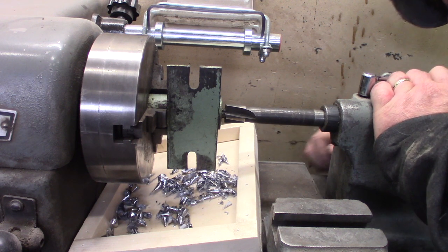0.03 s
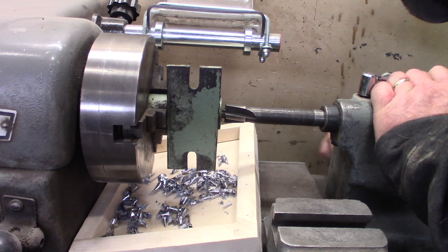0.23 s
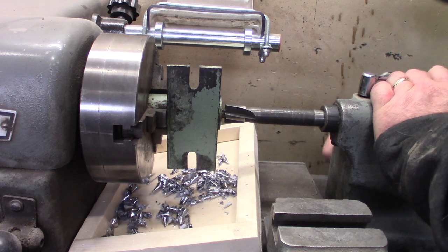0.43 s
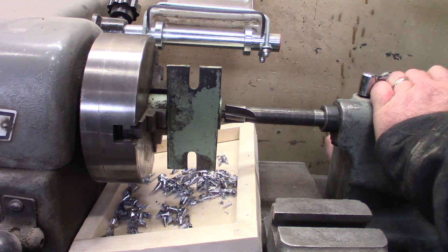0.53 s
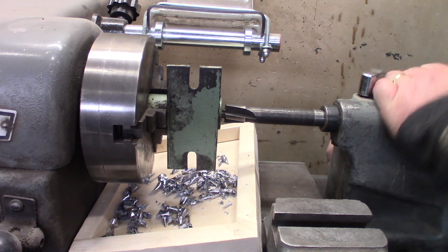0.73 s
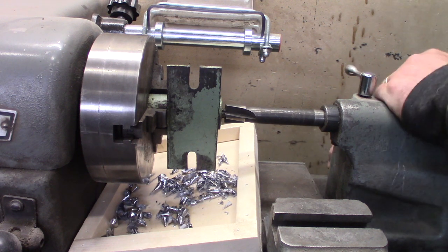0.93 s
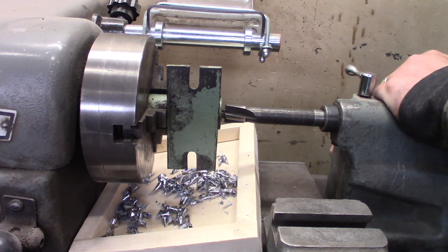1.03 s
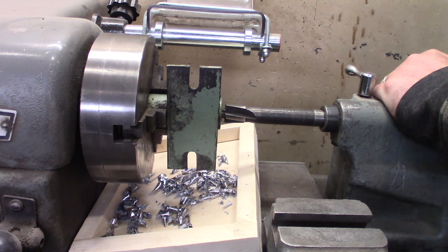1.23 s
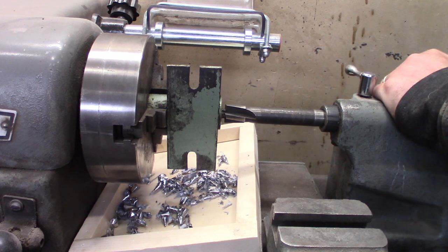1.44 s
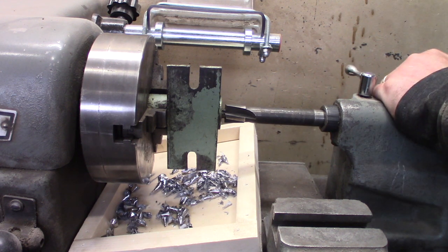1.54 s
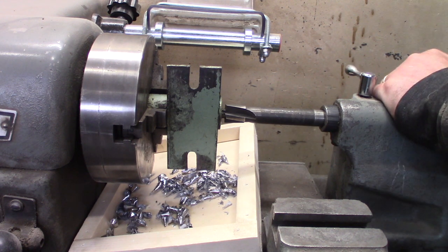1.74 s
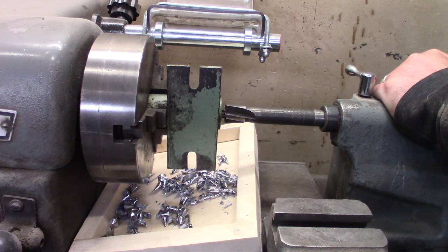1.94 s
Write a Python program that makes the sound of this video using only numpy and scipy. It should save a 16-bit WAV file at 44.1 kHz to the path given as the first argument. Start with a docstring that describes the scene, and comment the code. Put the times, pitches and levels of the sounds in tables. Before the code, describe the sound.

A steel lever on a still lathe is worked by hand, close up. A previous clack's ring fades over faint dull knocks. At 0.21 s a tick leads into a loud, sharp clack with quick rebounds, then weaker clicks at 0.40-0.43. A light knock at 0.72 joins a hand swish peaking near 0.8; small parts scuff and rattle around 1.15-1.2. Quiet shop air and hum continue until a low thud at 1.97.

```python
"""A steel lever on a lathe's tailstock is worked by hand: it ticks, clacks hard and rebounds.
Each blow rings damped modes, amid short contact noise and the longer noise of the machine bed.
The casting answers soft knocks with low modes; a sliding hand and rattling small parts are grainy noise.
The lathe stands still: a reverberant shop rings on over steady coloured noise and a wavering hum."""
import sys
import numpy as np
from scipy import signal
from scipy.fft import rfft, irfft, next_fast_len
from scipy.io import wavfile
from scipy.ndimage import map_coordinates

SR = 44100
rng = np.random.default_rng(int(sys.argv[2]) if len(sys.argv) > 2 else 0)


def voltage_ratio(decibels):
    """Convert decibels (scalar or array-like) to amplitude ratios, 20 dB per decade."""
    exponent = np.asarray(decibels, float) / 20
    return 10 ** exponent


def generate_wav(signal):
    """Clip the signal to [-1, 1] and save it as 16-bit WAV at the path in sys.argv[1]."""
    frames = np.transpose(np.atleast_2d(signal))
    scaled = np.clip(frames, -1, 1) * 32767
    pcm = np.round(scaled).astype(np.int16)
    wavfile.write(sys.argv[1], SR, pcm)


N = 88200  # samples
BLOW_T = np.arange(SR * 3 // 5) / SR  # time since a blow, s


def unit(x):
    """Power normalization: scales x to rms 1."""
    return x / np.sqrt(np.mean(x ** 2) + 1e-20)


def along(points, hz):
    """Linear interpolation of (Hz, value) points on a logarithmic frequency axis."""
    point_hz, value = np.transpose(points)
    return np.interp(np.log(hz + 1), np.log(point_hz + 1), value)


def filtered(x, response):
    """Linear filtering: the spectrum of x is multiplied by a response of frequency."""
    n = x.shape[-1]
    padded = next_fast_len(n + 8192)
    spectrum = rfft(x, padded) * response(np.fft.rfftfreq(padded, 1 / SR))
    return irfft(spectrum, padded)[..., :n]


def noise(spectrum, size, colour=lambda hz: 0):
    """Spectral shaping: white noise is coloured, with extra dB from colour, and set to rms 1."""
    white = rng.standard_normal(size)
    return unit(filtered(white, lambda hz: voltage_ratio(along(spectrum, hz) + colour(hz + 50))))


def wobble(rate):
    """Slow random modulation: a spline through random knots, rate knots a second."""
    knots = rng.standard_normal(int(N * rate / SR) + 4)
    return map_coordinates(knots, [np.arange(N) * rate / SR])


def decay(db, t60):
    """Exponential damping: starts at a level in dB and falls by 60 dB in t60 seconds."""
    return voltage_ratio(db - 60 * BLOW_T / t60)


def lift(hz, hz0, lift_db, octaves):
    """Modal excitation: where a blow lands favours the modes near one pitch."""
    return lift_db * np.exp(-(np.log2(hz / hz0) / octaves) ** 2)


def ring(modes, colour):
    """Modal superposition: damped sines struck together, with levels and phases varied by chance."""
    hz, db, t60 = np.transpose(modes)[..., None]
    chance = rng.standard_normal((2, len(modes), 1))
    level = voltage_ratio(db + colour(hz) + 1.6 * chance[0])  # scatter in dB
    phase = 0.92 * chance[1]  # radians
    waves = level * decay(0, t60) * np.sin(2 * np.pi * hz * BLOW_T + phase)
    return waves.sum(0) / np.sqrt(np.sum(level ** 2))


def clack(db, tilt_db, hz0, lift_db):
    """Impact excitation: steel on steel rings modes amid fast contact noise and the slower bed."""
    # Modes of the lever and clamp. Each row: frequency in Hz, relative level in dB, t60 in seconds.
    steel = [(1196, -16.5, 0.12), (1447, -3.5, 0.11), (1667, -8.5, 0.083), (1930, -12.5, 0.145),
             (2068, -1, 0.076), (2208, -10, 0.16), (2325, -3, 0.0391), (2322, -5.5, 0.024),
             (2546, -9, 0.055), (2708, -19.5, 0.056), (2980, -17.5, 0.064), (3664, -4.5, 0.062),
             (4216, 1, 0.047), (4558, -9, 0.046), (4530, -5, 0.064), (5186, -3, 0.052),
             (5600, -10.5, 0.082), (5970, -9.5, 0.047), (6930, -14, .04), (7740, -13, 0.06),
             (8460, -15.5, .05), (10140, -7, 0.029)]
    # Rattle of the contact. Each row: frequency in Hz, relative spectral level in dB per Hz.
    chatter_tone = [(250, -38), (720, -3.5), (1000, -15), (1450, -8.5), (2150, -7), (3200, -10.5),
                    (4500, -5.5), (5400, -7.5), (6800, -10.5), (10000, -13), (12000, -25.5), (15500, -52)]
    # Dense ringing of the machine bed. Each row: frequency in Hz, relative spectral level in dB per Hz.
    bed_tone = [(180, -31), (300, -18), (600, -10.5), (869, -8.5), (1420, -4), (2300, -2), (3440, -5),
                (5200, -7), (7670, -15.5), (15000, -52.5)]

    def colour(hz):
        return tilt_db * np.log2(hz) + lift(hz, hz0, lift_db, octaves=0.24)

    chatter = decay(-6, t60=0.057) * noise(chatter_tone, len(BLOW_T), colour)
    bed = decay(-28.5, t60=0.65) * noise(bed_tone, len(BLOW_T))
    onset = 1 - np.exp(-BLOW_T / 0.0003)  # time constant in seconds
    return voltage_ratio(db) * onset * (ring(steel, colour) + chatter + bed)


def lever():
    """Superposition of impacts: the ticks, clacks and rebounds of the lever add up."""
    # Steel blows. Each row: start in seconds, level in dB, treble tilt in dB per octave,
    # favoured pitch in Hz, its lift in dB.
    clacks = [(.2138, -27.5, -4.5, 5960, 18), (.2222, -43, -19, 2130, -4), (0.2251, -7, -0.5, 4660, 1.5),
              (.2305, -11.5, 4, 4600, 4.5), (.2342, -21, -3, 1700, 3), (.2435, -22.5, -6.5, 1730, 0),
              (.400, -35.5, -5.5, 1700, 5.5), (.4302, -27, -8, 2280, 31), (.4305, -30, -4.5, 5200, 7),
              (0.4322, -25, -6, 2660, 24), (1.1515, -43, 1, 2230, 23), (1.1515, -48, 8, 6900, 16),
              (1.158, -50, -2, 2120, 12), (1.1755, -48, 8, 6150, 29), (1.188, -38.5, -8, 2940, 22.5),
              (1.1885, -45, -5.5, 7060, 18)]
    out = np.zeros(N + SR)
    for start, *blow in clacks:
        out[round(start * SR):][:len(BLOW_T)] += clack(*blow)
    return out[:N]


def casting():
    """Contact-time filtering: soft blows swell in, lose treble and ring the low modes of the casting."""
    # Dull knocks. Each row: start in seconds, level in dB, favoured pitch in Hz, its lift in dB,
    # softness (time constant of the onset) in seconds.
    knocks = [(0.014, -39.5, 284, 3, 0.0052), (0.043, -37, 306, -2, 0.0071),
              (0.2256, -19.5, 740, 13, 0.00038), (.228, -26.5, 257, 3, 0.003),
              (.232, -28, 500, 17.5, 0.0013), (0.27, -31.5, 231, 24, 0.0021), (0.299, -42, 105, 50, 0.0046),
              (0.438, -35.5, 327, 10, 0.00092), (0.7164, -34.5, 744, 17.5, 0.00039),
              (.722, -40, 243, 7, 0.0015), (.844, -43, 1200, 21.5, 0.001), (.850, -42, 745, 21, 0.0011),
              (0.862, -37.5, 1170, 19, 0.0012), (.869, -45.5, 1280, 30, 0.0016),
              (1.137, -56, 1200, 25, 0.0013), (1.165, -43, 503, 8.5, 0.0013),
              (1.1765, -55, 700, 0, 0.00079), (1.188, -36, 1200, 15, 0.00078),
              (1.1917, -40.5, 445, 20, 0.0013), (1.967, -33, 795, 0, 0.0023), (1.973, -36, 718, 18, 0.002),
              (1.9775, -26, 249, 12, 0.0034)]
    # Modes of the casting. Each row: frequency in Hz, relative level in dB, t60 in seconds.
    modes = [(105, -24, 0.27), (200.3, 0, 0.21), (253.5, 0.5, 0.15), (316.3, 1.5, 0.073), (500, -3, 0.11),
             (700, -1, 0.054), (809, 0, 0.068), (1200, -2, 0.057), (1467, 0, 0.14)]
    # Blur of a knock. Each row: frequency in Hz, relative spectral level in dB per Hz.
    thud_tone = [(60, -69), (180, 6.5), (700, -2), (1500, -2), (3000, -29), (6000, -87)]
    out = np.zeros(N + SR)
    for start, db, hz0, lift_db, soft in knocks:
        def colour(hz):
            dulling_db = 20 * np.log10(1 + (hz * soft / 1.4) ** 2)  # corner at 1.4 / softness, in Hz
            return lift(hz, hz0, lift_db, octaves=0.16) - dulling_db

        thud = decay(-9, t60=0.16) * noise(thud_tone, len(BLOW_T), colour)
        onset = (1 - np.exp(-BLOW_T / abs(soft))) ** 2
        out[round(start * SR):][:len(BLOW_T)] += voltage_ratio(db) * onset * (ring(modes, colour) + thud)
    return out[:N]


def rubbing(stroke, tone, db, grainy_db, rate):
    """Friction noise: grainy noise follows the level of a stroke and is brightest at its peak."""
    treble_hz, treble_grows = 7040, 0.65  # treble gains this many extra dB per dB of level
    start, level = np.transpose(stroke)
    times = [start[0] - .03, *start, start[-1] + 0.059]
    stroke_db = np.interp(np.arange(N) / SR, times, [-100, *level, -100])
    rub = unit(voltage_ratio(grainy_db * wobble(rate)) * noise(tone, N))
    treble = filtered(rub, lambda hz: 1 / (1 + (treble_hz / (hz + 1)) ** 4))
    treble_gain = voltage_ratio(treble_grows * (stroke_db - max(level)))
    return voltage_ratio(stroke_db + db) * (rub - treble + treble * treble_gain)


def slide():
    """Sliding friction: a hand passes over the casting, lightly, then in one swish."""
    # Level of the stroke. Each row: time in seconds, level in dB.
    stroke = [(0, -53.5), (.09, -59.5), (.14, -62), (.5, -61), (.6, -56.5), (.7, -53), (.74, -48),
              (.8, -43.5), (.845, -45), (.875, -51.5), (.91, -56), (.95, -59), (1.0, -59.5), (1.08, -68)]
    # Colour of the rubbing. Each row: frequency in Hz, relative spectral level in dB per Hz.
    tone = [(200, -29.5), (500, 0), (1500, -4), (2600, -8), (3600, -7), (4400, -10.5), (5800, -8),
            (6500, -10.5), (7500, -8.5), (8700, -4.5), (9600, -11), (11500, -16.5), (13300, -26),
            (15500, -43), (16500, -89)]
    return rubbing(stroke, tone, db=0, grainy_db=1, rate=260)


def rattle():
    """Irregular friction: small parts rattle in a scuffing shove, with a finer grain."""
    # Level of the shove. Each row: time in seconds, level in dB before the gain db below.
    stroke = [(1.08, -70), (1.134, -50), (1.156, -48), (1.172, -49.5), (1.19, -42.5), (1.226, -68),
              (1.26, -61.5)]
    # Colour of the rattle. Each row: frequency in Hz, relative spectral level in dB per Hz.
    tone = [(120, -31), (200, -1), (849, -1), (1290, -2.5), (1810, -8), (2210, -10.5), (7830, -20),
            (15000, -48)]
    return rubbing(stroke, tone, db=1, grainy_db=1, rate=520)


def blend(a, b, alike):
    """Correlated pair: half the angle whose cosine is the likeness sets the shares of a and b."""
    half_angle = np.arccos(np.clip(alike, -1, 1)) / 2
    return np.cos(half_angle) * a, np.sin(half_angle) * b


def shop(x):
    """Reverberation: convolution with noise whose every frequency decays at its own speed."""
    # Decay of the shop. Each row: frequency in Hz, t60 in seconds.
    t60 = [(150, 2.7), (700, 0.47), (2500, 1.43), (6000, 1.42), (12000, 0.47)]
    # Colour of the answer. Each row: frequency in Hz, relative level in dB.
    tone = [(100, 2), (400, 7), (1000, 1), (2500, 3), (6000, -5.5), (12000, -4)]
    hz, t, z = signal.stft(rng.standard_normal((2, SR * 3 // 2)), SR, nperseg=256)
    z = z * voltage_ratio(along(tone, hz)[:, None] - 60 * t / along(t60, hz)[:, None])
    a, b = signal.istft(z, SR, nperseg=256)[1]
    mid, side = blend(a, b, alike=0.95)
    tail = np.array([mid + side, mid - side]) / np.linalg.norm(a)
    delayed = np.pad(x, (400, 0))[None]  # delay in samples
    return signal.fftconvolve(delayed, tail, axes=1)[:, :len(x)]


def hum():
    """Harmonic tones: mains hum whose sines waver slowly in level and phase."""
    # Partials of the hum. Each row: frequency in Hz, rms level in dB before the wavering.
    partials = [(120, -74.5), (240, -79), (478, -70.5)]
    t = np.arange(N) / SR
    out = np.zeros(N)
    for hz, db in partials:
        level = np.sqrt(2) * voltage_ratio(db + 2.2 * wobble(4.54))
        out += level * np.sin(2 * np.pi * hz * t + 2.3 * wobble(4.2))
    return out


def air():
    """Diffuse background: steady, slightly uneven noise whose two sides agree by frequency."""
    # The shop's air. Each row: frequency in Hz, relative spectral level in dB per Hz.
    floor = [(15, -62.5), (25, -31), (86, -6.5), (107, -6.5), (160, -6.5), (189, -3), (423, -6), (478, -6),
             (875, -9), (1630, -16.5), (6780, -22), (15600, -36.5)]
    # Likeness of left and right. Each row: frequency in Hz, correlation from 0 to 1.
    alike = [(60, 0.73), (180, 0.5), (550, 0.61), (1650, 0.65), (4970, 0.86), (15000, 0.79)]

    def response(hz):
        level = voltage_ratio(along(floor, hz))
        return np.array(blend(level, level, along(alike, hz)))

    mid, side = filtered(rng.standard_normal((2, N)), response)
    return voltage_ratio(-57.5 + 0.17 * wobble(7.04)) * np.array([mid + side, mid - side]) / np.std(mid)


def scene():
    """Direct and reverberant fields: slightly wide near sounds, the shop's answer, its air and hum."""
    # Width of the near sounds. Each row: frequency in Hz, level of side relative to mid in dB.
    side_db = [(100, -24.5), (1000, -37), (2500, -16), (5000, -20), (10000, -16.5)]
    mic_low_hz, side_phase = 130, 1.65  # Hz, radians
    near = lever() + casting() + slide() + rattle()
    near = filtered(near, lambda hz: (1j * hz / (1j * hz + mic_low_hz)) ** 2)
    side = filtered(near, lambda hz: voltage_ratio(along(side_db, hz)) * np.exp(1j * side_phase))
    # A clack 0.31 s before the start still rings in the shop.
    lead = round(0.31 * SR)
    earlier = clack(db=-15.5, tilt_db=0, hz0=1380, lift_db=2.0)[:lead]
    before = np.pad(earlier, (0, SR))[:lead]
    wet = shop(np.concatenate([before, near]))[:, lead:]
    return np.array([near + side, near - side]) + voltage_ratio(-21) * wet + air() + hum()


def low_pass(x):
    """Removes everything above the highest recorded frequency."""
    return signal.sosfilt(signal.butter(12, 15780, fs=SR, output="sos"), x)


def record(dry):
    """Saturation and band limiting: the input rounds off the highest peaks and cuts the top treble."""
    clip_top, top_hz = .66, 15750  # ceiling of the rounding in full scale, Hz
    rounded = dry / (1 + np.abs(dry / clip_top) ** 6) ** (1 / 6)
    mix = filtered(rounded, lambda hz: hz < top_hz)
    return low_pass(mix)


dry = scene()
out = record(dry)
generate_wav(out)
```